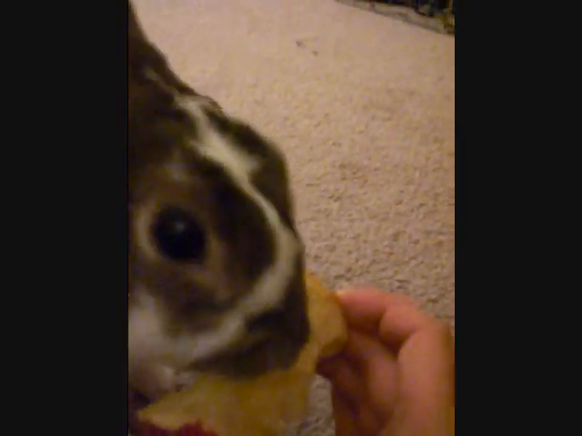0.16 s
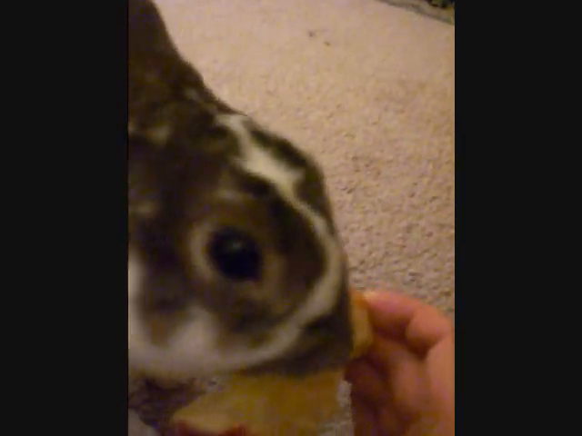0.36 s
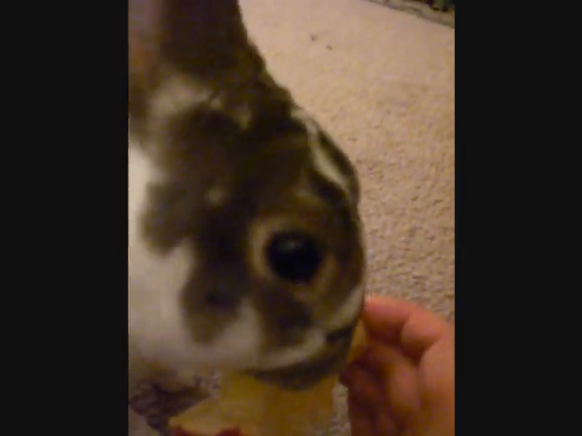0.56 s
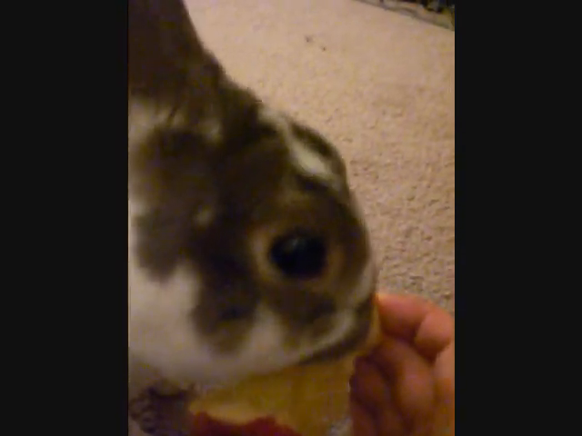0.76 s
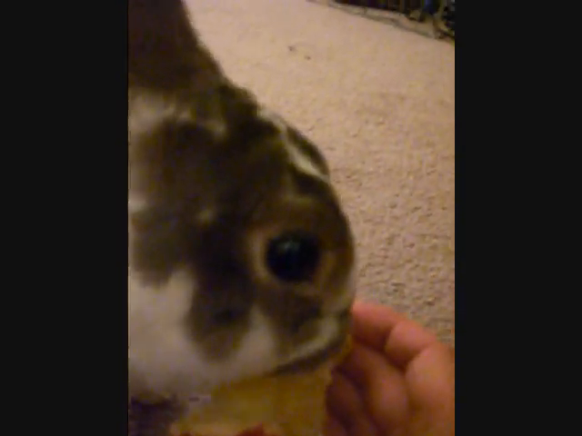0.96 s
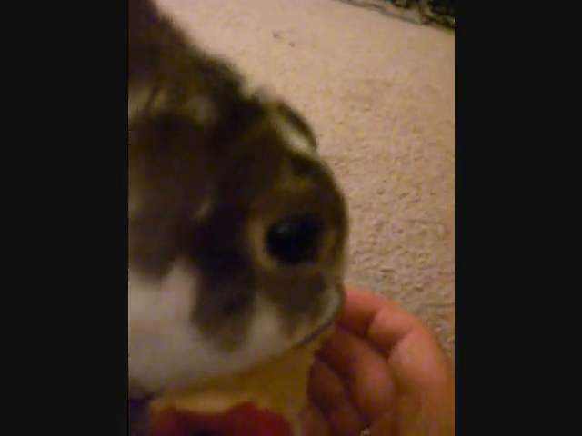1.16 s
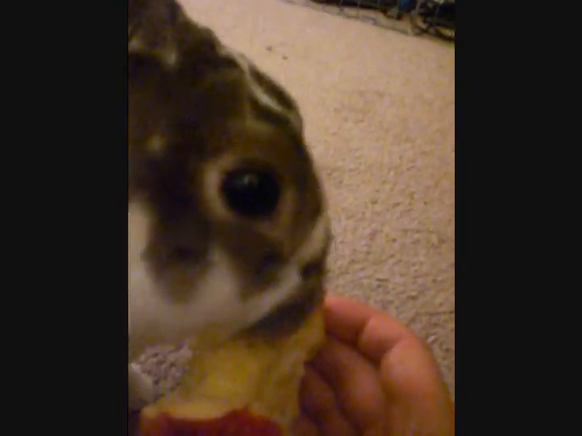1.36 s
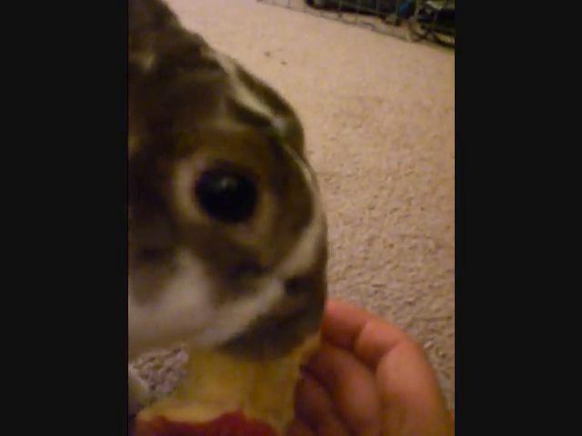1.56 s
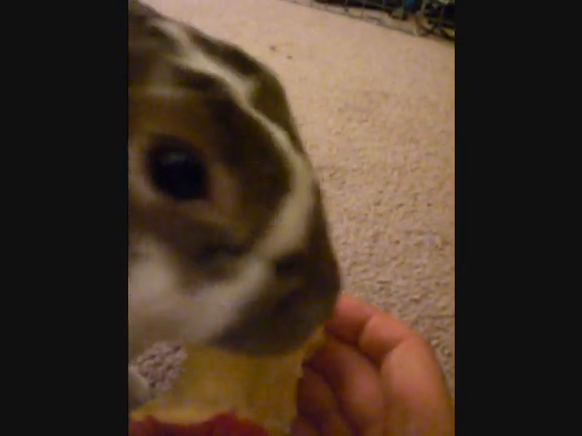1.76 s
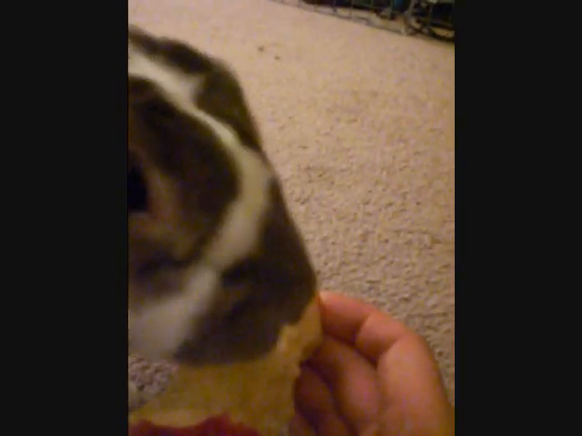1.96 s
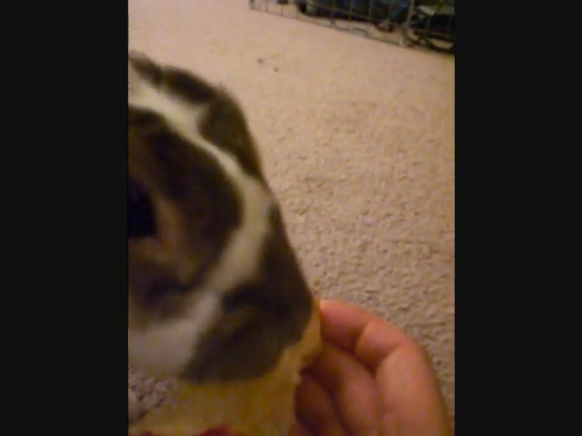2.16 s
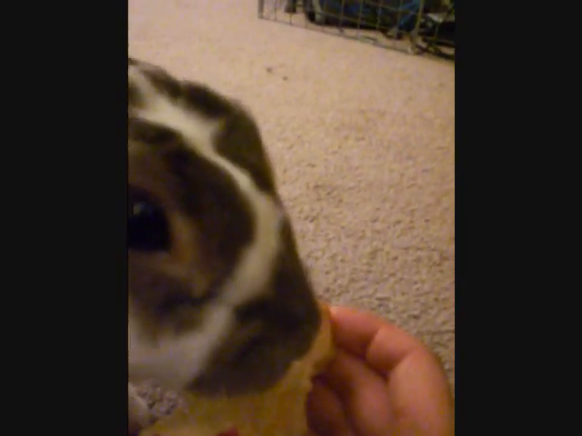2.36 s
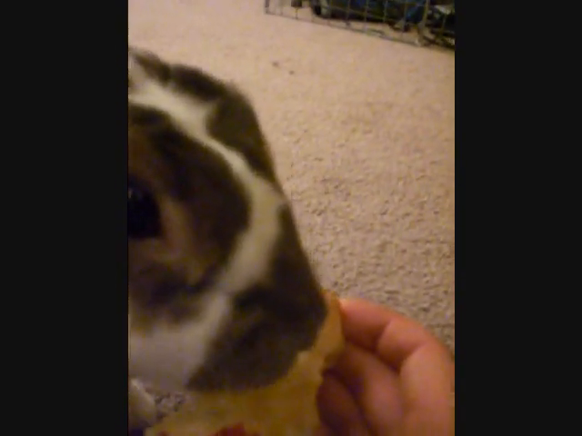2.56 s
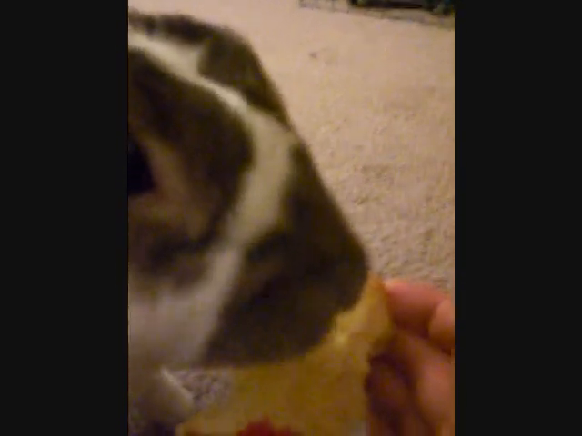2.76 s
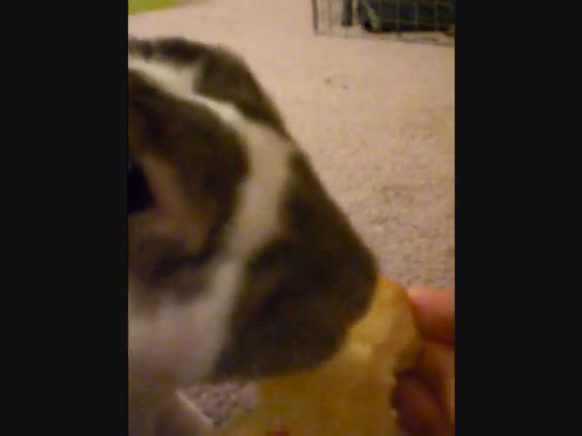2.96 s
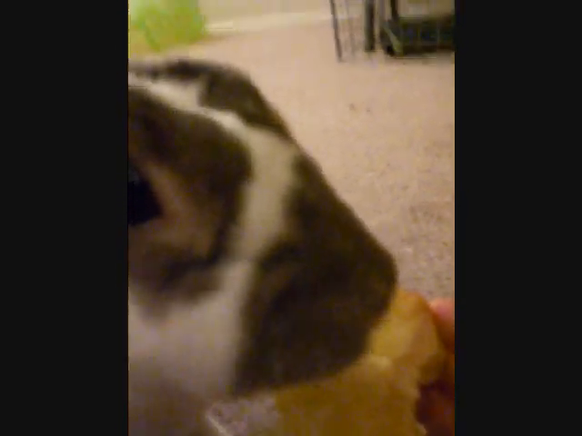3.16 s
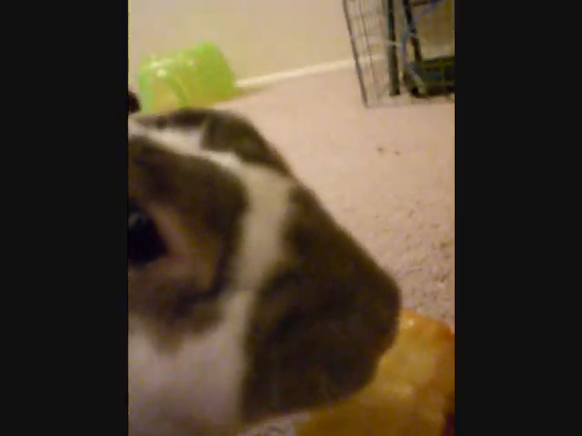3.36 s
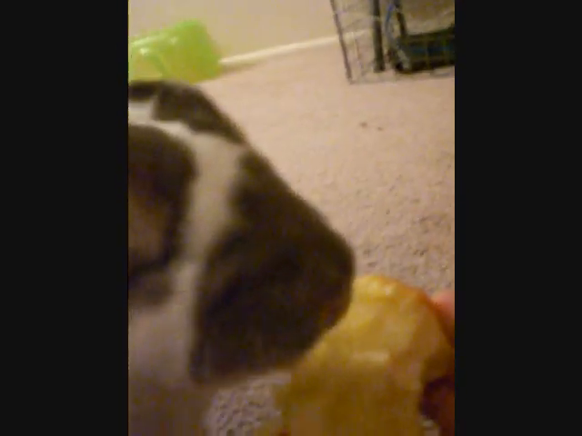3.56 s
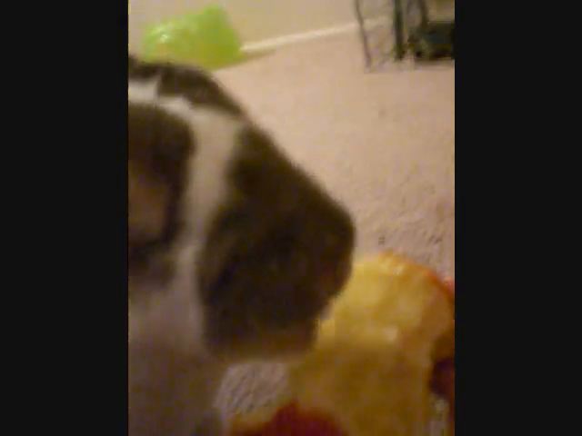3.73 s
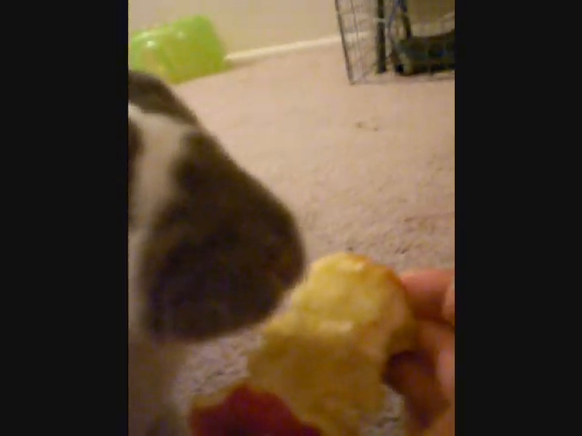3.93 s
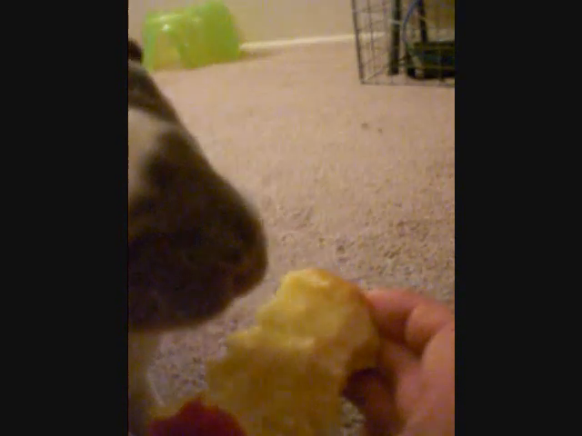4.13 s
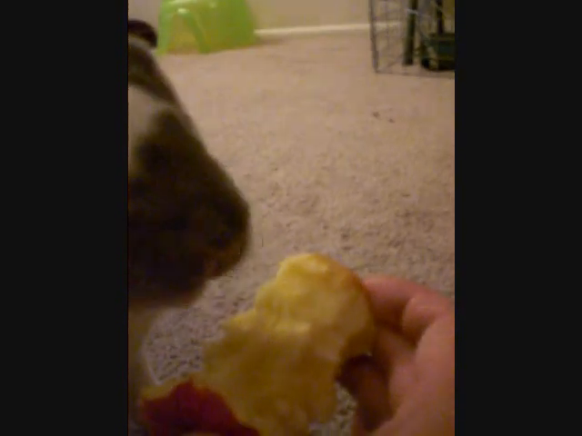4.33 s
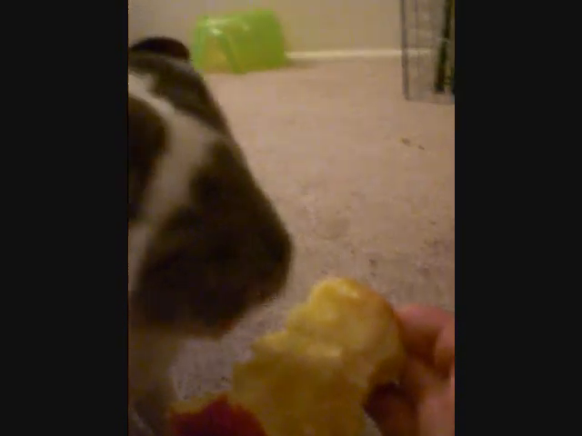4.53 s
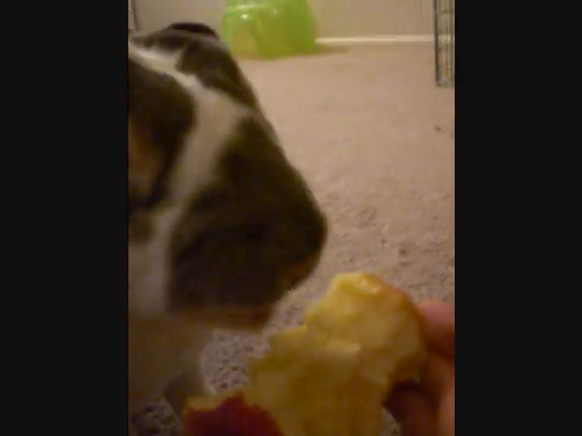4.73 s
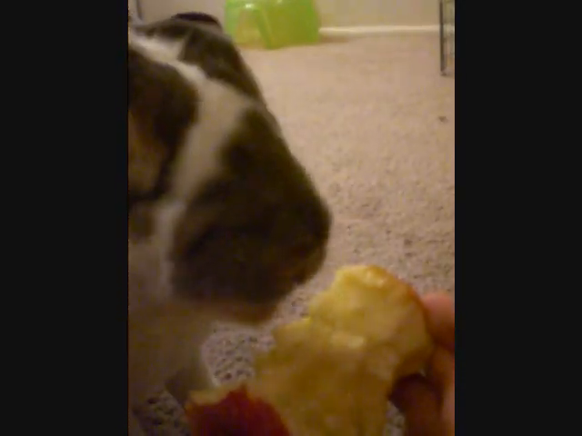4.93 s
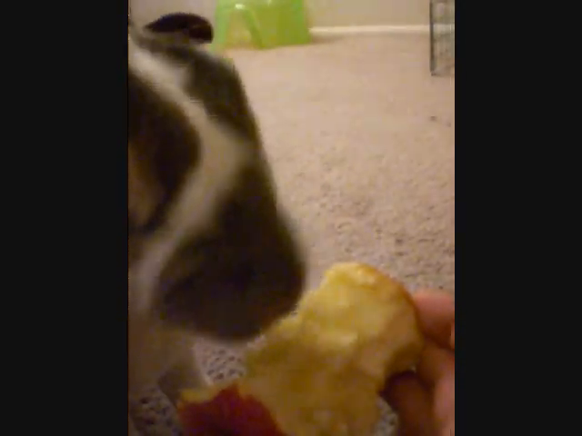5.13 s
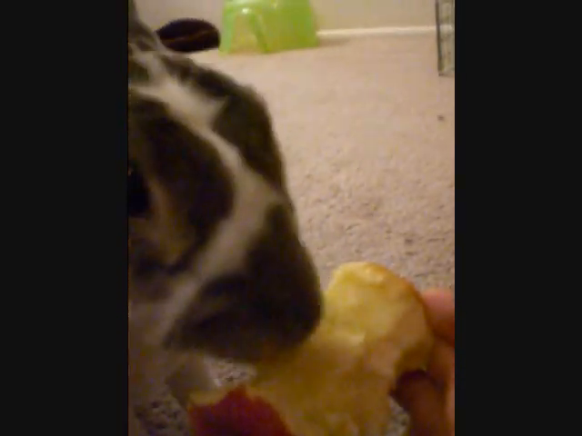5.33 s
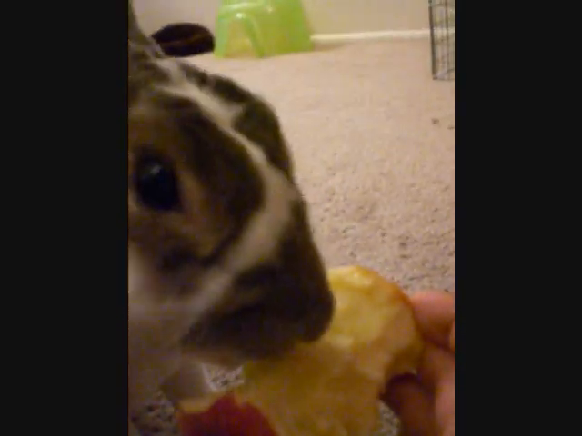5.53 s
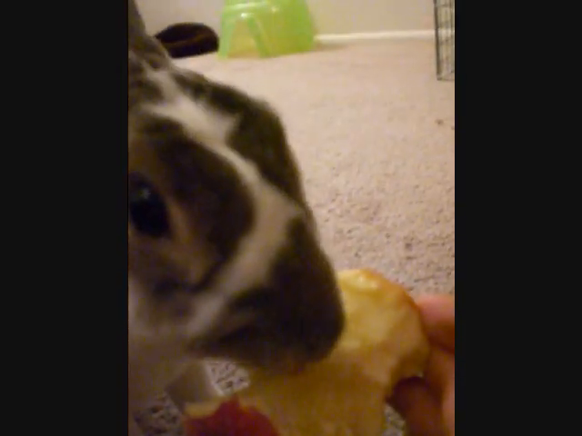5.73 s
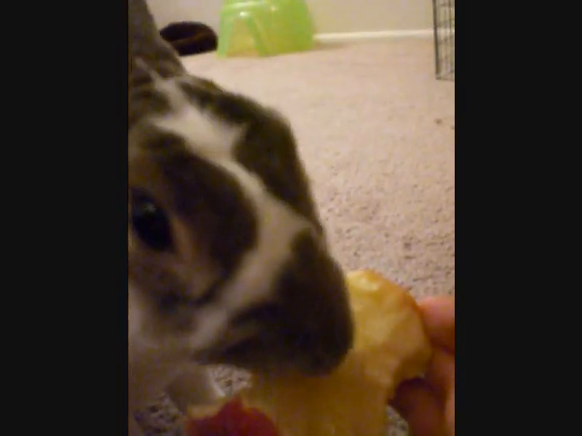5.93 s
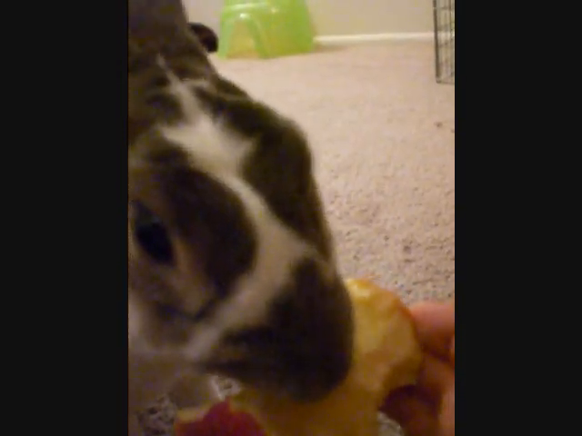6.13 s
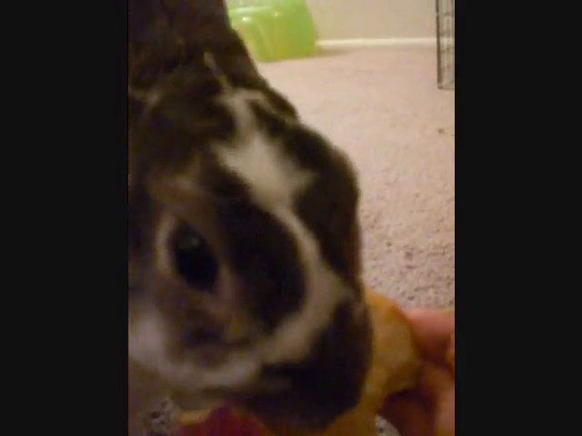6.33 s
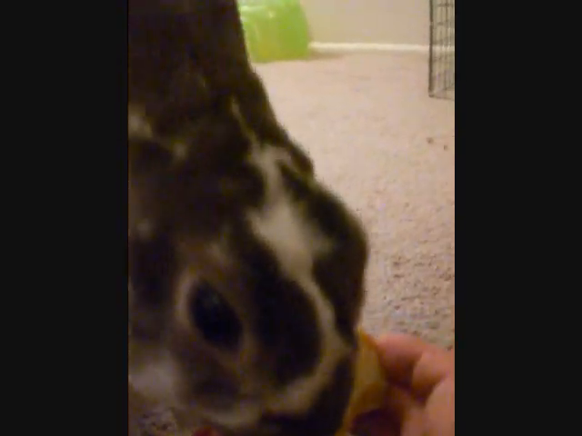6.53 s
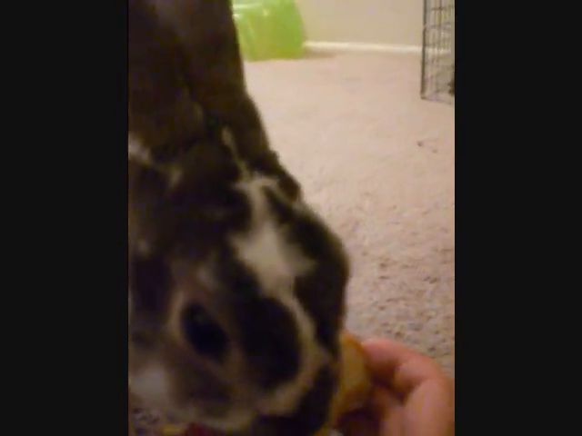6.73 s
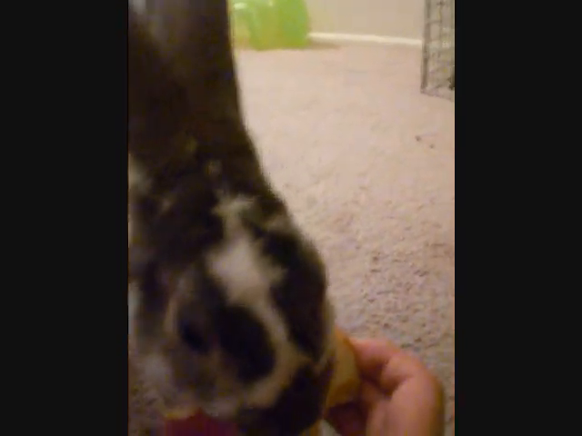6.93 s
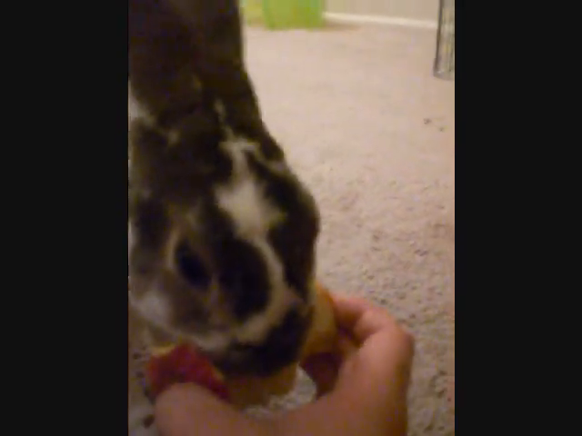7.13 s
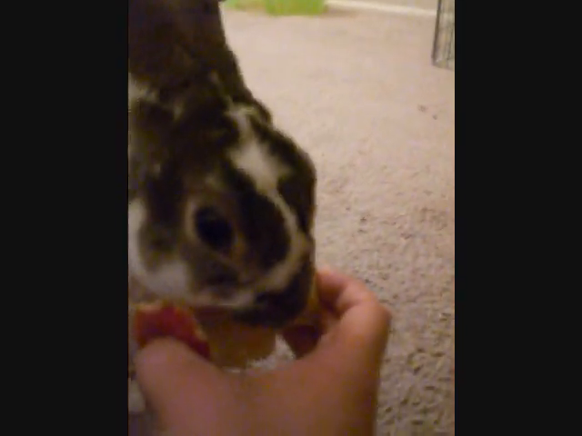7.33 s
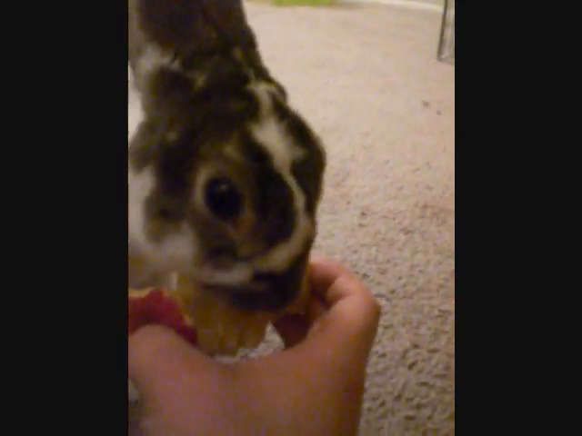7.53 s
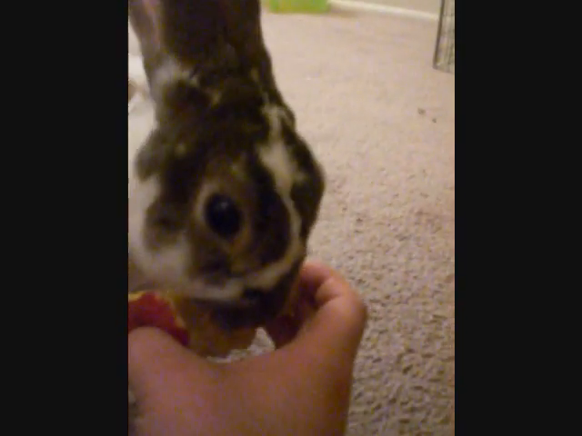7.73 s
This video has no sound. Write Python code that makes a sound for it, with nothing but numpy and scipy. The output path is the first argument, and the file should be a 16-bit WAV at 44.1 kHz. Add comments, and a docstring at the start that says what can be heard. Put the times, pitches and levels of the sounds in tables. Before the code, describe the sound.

Very close to a small microphone in a quiet carpeted room, a rabbit scrapes and bites crisp apple with juicy crunches and sharp snaps. After a second and a half it settles into soft, quick, pulpy chewing, about five strokes a second, with faint rubbing from movement. Near six seconds the crisp biting returns, brighter and with harder cracks, until the end.

```python
"""A rabbit bites crisp apple close to a small microphone: bursting cells excite resonances and noise bands.
Single fractures are sharp pulses with a splintering tail, ringing teeth and fruit. Two bouts of biting frame
some four seconds of closed-mouth chewing, about six strokes a second, some of them double; strokes also
underlie the first bout. Pressure pulses shape grinding, pulp and slosh noise. Gliding sines squeak, sparse
ticks mark wet lips, and filtered noise gives the rubbing and room hush."""
import sys
import numpy as np
from scipy import signal
from scipy.fft import rfft, irfft, next_fast_len
from scipy.io import wavfile
from scipy.ndimage import uniform_filter1d

SR = 44100
rng = np.random.default_rng(int(sys.argv[2]) if len(sys.argv) > 2 else 0)


def materialize(psi):
    """Save the field psi as 16-bit PCM at rate SR to the path in sys.argv[1].

    A 1-D psi becomes a single channel; in a 2-D psi each row is a channel.
    """
    bounded = np.clip(np.atleast_2d(psi).T, -1, 1)
    quanta = np.round(bounded * 32767).astype(np.int16)
    wavfile.write(sys.argv[1], SR, quanta)


N = 343539
TIME = np.arange(N) / SR

# Steady room hush, as a spectrum: f/Hz, relative level/dB
ROOM_SPECTRUM = [(25, -15), (60, -5), (130, -1.5), (200, -1), (330, -3), (600, -5.5), (1200, -9.5),
                 (2500, -15), (5000, -22), (10000, -26)]
# Rabbit and hand shifting, each move swelling and fading:
# middle t/s, half-width t/s, rumble level/dB, rub level/dB, swish level/dB
MOVES = [(0.5, 1.6, -71, -56, -66), (2.55, 1.05, -73, -53, -61.5), (4.0, 0.45, -56, -54.5, -55),
         (5.1, 0.6, -63, -57.5, -63.5), (7.0, 1.2, -80, -66.5, -64)]
# Spectra of the three friction layers, low to high: f/Hz, relative level/dB
RUMBLE_SPECTRUM = [(50, -17), (115, 1), (160, -8.5), (208, 10.5), (235, -3), (285, 6.5), (330, -9),
                   (600, -34.5)]
RUB_SPECTRUM = [(400, -2), (1000, 3), (1900, 2.5), (2700, -5), (4000, -10), (9000, -55)]
SWISH_SPECTRUM = [(1000, -23), (3000, 5.5), (6000, 9), (10000, 3)]
# Teeth scraping lightly all through a bout of biting: start t/s, end t/s, crunch level/dB
SCRAPING_BOUTS = [(0, 1.46, -58), (6.046, 7.79, -60.5)]
# Incisors pressing through the apple: start t/s, length t/s, attack t/s, mid-bite crunch level/dB,
# swell over the bite level/dB, body re crunch level/dB, fizz re crunch level/dB,
# resonance of the hollow between lips and fruit f/Hz
BITES = [(0.081, 0.18, 0.028, -40.5, -3.5, -2, -5, 4450), (0.436, .19, 0.021, -41.5, -3, -4, -3.5, 3860),
         (0.807, .2, 0.014, -42, 1, -6, -5.5, 4870), (1.052, .11, .02, -54, 5, -2, -2, 3780),
         (1.155, 0.19, 0.026, -44.5, -1, -4.5, -1, 3430), (1.392, 0.053, .02, -48, 0, -5, -2.5, 3460),
         (5.908, .038, 0.0065, -47.5, -1, 4.5, -4, 5940), (6.103, 0.088, 0.01, -37.5, -3, -6, -1, 5870),
         (6.297, 0.11, 0.049, -38.5, -7.5, -3, 1.5, 5730), (6.446, 0.1, 0.011, -48.5, -8, -2.5, -0.5, 5600),
         (6.699, 0.17, 0.027, -43, -6, -1.5, 2, 5870), (6.878, 0.028, .005, -53, 1, -9, -10, 5500),
         (6.994, 0.2, 0.016, -44.5, 4, -2.5, -4.5, 5750), (7.361, 0.096, 0.032, -40, 7, -3.5, 2.5, 5760),
         (7.462, 0.094, 0.008, -40, -5, -3, -1, 3600), (7.754, 0.044, .003, -43, 2, 2.5, 6.5, 6140)]
# A patch of cells giving way all at once:
# middle t/s, half-width t/s, crunch level/dB, fizz re crunch level/dB
COLLAPSES = [(0.108, 0.0056, -42, -7), (0.242, 0.012, -33, -15), (0.467, 0.0046, -41, 0),
             (0.501, 0.0085, -32.5, -2), (0.768, 0.0029, -44, 0), (0.838, 0.018, -45.5, 4),
             (0.938, 0.0036, -39, -10), (0.962, 0.011, -38, -13), (1.028, 0.011, -38.5, -1),
             (1.282, 0.013, -35, -3), (1.315, 0.0043, -41, 10), (6.15, 0.0035, -33, 6.5),
             (6.162, 0.009, -35.5, 5), (6.359, .004, -35, 3), (6.382, 0.0064, -32.5, -15),
             (6.43, 0.0054, -34, -5), (6.47, 0.0044, -35.5, -3), (6.606, 0.0047, -43, 8.5),
             (6.776, 0.022, -36.5, 4.5), (7.08, 0.019, -40, -2), (7.128, 0.015, -39, 4.5),
             (7.423, 0.0055, -30, -10), (7.546, 0.0045, -40, -8)]
# Single fractures and tooth clicks: t/s, nominal crack energy level/dB, ring f/Hz,
# body re crack level/dB, fizz re crack level/dB
FRACTURES = [(0.0085, -19, 2400, -6, -13), (0.1172, -10.5, 4300, -22, -11), (0.1412, -6, 4350, -6, -5.5),
             (0.1816, -25, 3200, -17, -8), (0.2377, -16, 3600, -18, 4), (0.2491, -2, 4460, -12, -10),
             (0.265, -31, 4000, 13, -6), (0.397, -29, 4500, 5, 4.5), (0.8866, -3, 5300, -11, -20),
             (0.905, -18, 5200, -20, -18), (0.9338, -12, 4870, -7, -23), (0.9486, -10.5, 4720, -6, -22),
             (0.9864, -13, 5200, -23, -15), (0.9903, -7.5, 5340, -14, -12), (1.0263, 1.5, 5380, -9, -6.5),
             (1.2692, -11.5, 3300, -17, -10), (1.2805, -10.5, 3680, -10, -6),
             (1.5256, -18.5, 3360, -12, -27), (1.5322, -16.5, 3450, -9, -23),
             (1.5774, -17.5, 6440, -13, -21), (1.5993, -23.5, 4570, 2, -18), (1.6392, -12.5, 3100, -2, -5),
             (1.7268, -28, 4500, 10.5, -12), (1.7595, -22, 2940, -18, -25), (1.791, -18.5, 2860, -5, -20),
             (1.9514, -23.5, 2940, 7, -26), (1.966, -20.5, 2710, 3, -32), (2.5498, -18.5, 2950, -29, -22),
             (2.583, -23.5, 3140, -7, -32), (2.7752, -16, 2950, -8, -24), (3.3903, -16.5, 2870, -6, -22),
             (3.588, -9.5, 3100, -7, -15), (3.7969, -24.5, 5000, 2, -14), (4.0712, -33, 2400, 18, -14),
             (4.598, -23, 4550, -16, -26), (4.7806, -28.5, 4060, -8, -20), (4.9951, -24.5, 4300, 6, -18),
             (5.1761, -33.5, 3000, 18, 2), (5.4114, -39, 4000, 15, -13), (5.9422, -25, 4370, 4, -4),
             (5.9983, -33, 2400, 20, -22), (6.004, -31.5, 2400, 12, -18), (6.0085, -29, 2400, 11, -18),
             (6.073, -29, 3500, -7, -7), (6.2758, -18.5, 5960, -11, -7), (6.3849, -8, 5900, -9, -19),
             (6.4209, 1, 4170, -9, -4.5), (6.5649, -32, 6000, -12, 5), (6.579, -16.5, 5760, -9, 4),
             (6.5992, -28.5, 5900, 11.5, 8), (6.6107, -18, 6430, -13, 1), (6.6655, -22.5, 5660, -7, -1),
             (6.859, -9, 6240, -7.5, -6), (6.9399, -26, 3500, -1, -2), (6.9714, -17.5, 3900, 0, -9),
             (7.0782, 7, 4880, -5.5, -15), (7.1072, -9.5, 5640, -8.5, -14), (7.3283, -26.5, 3700, 2, 2),
             (7.474, -6.5, 3400, -8.5, -0.5), (7.5178, -8.5, 3640, -15, -12), (7.6763, -23, 6100, -6, -1.5)]
# Molar strokes, a double stroke taking two rows: greatest pressure t/s,
# cheek level/dB and pulp level/dB before the layer trims,
# closing time of the pulp t/s, cheek resonance f/Hz
MOLAR_STROKES = [(.05, -46, -52, 0.012, 930), (0.54, -42, -43, 0.004, 870), (.874, -45.5, -54, 0.024, 910),
                 (1.281, -40.5, -48, .012, 910), (1.532, -56, -53, 0.018, 1300),
                 (1.64, -53.5, -56, 0.066, 1220), (1.792, -45.5, -53.5, 0.012, 1200),
                 (1.957, -62, -69, 0.019, 1190), (2.065, -49, -51, 0.025, 930),
                 (2.272, -49.5, -52, 0.025, 890), (2.47, -55, -55, 0.027, 890),
                 (2.708, -43.5, -48.5, 0.015, 940), (2.88, -50.5, -57.5, 0.025, 850),
                 (2.932, -48.5, -52.5, 0.028, 910), (3.139, -50.5, -50.5, .046, 910),
                 (3.338, -45.5, -49, 0.032, 960), (3.534, -45.5, -48.5, 0.036, 970),
                 (3.676, -46, -51, 0.01, 910), (3.742, -48.5, -54.5, 0.032, 880),
                 (3.925, -53, -52.5, .025, 980), (3.969, -48, -49.5, 0.017, 940),
                 (4.228, -73, -49, .0095, 1090), (4.362, -53.5, -67, .02, 1020),
                 (4.443, -51, -56, .01, 920), (4.508, -48, -51, 0.027, 890), (4.733, -46.5, -50, .018, 950),
                 (4.97, -45.5, -50.5, 0.024, 990), (5.185, -51, -56.5, .05, 1040),
                 (5.38, -47, -48.5, 0.016, 970), (5.569, -49, -50.5, 0.02, 1030),
                 (5.749, -48, -49.5, 0.039, 1090)]
# Spectrum of the squelching pulp: f/Hz, relative level/dB
PULP_SPECTRUM = [(500, -3), (1000, 2.5), (1600, 4.5), (2300, 2), (3100, 3.5), (4200, -4), (6000, -2),
                 (10000, -10)]
# Short wet squeaks of the fruit: start t/s, length t/s, start f/Hz, end f/Hz, rms level/dB
FRUIT_SQUEAKS = [(1.041, 0.0039, 990, 890, -46), (5.198, 0.065, 1390, 1197, -55)]
# Narrow dips of the microphone port: f/Hz, width f/Hz, depth level/dB
PORT_DIPS = [(6640, 250, -33), (7380, 127, -24)]

ROOM_DB, DRONE_DB, DRONE_HZ, DRONE_WIDTH_HZ = -54, -61, 239.2, 13.4
BITE_RELEASE_S = 0.0077
COLLAPSE_BODY_DB = -7.5  # re its crunch
SCRAPE_BODY_DB, SCRAPE_FIZZ_DB = -2, -2  # re its crunch
SCRAPE_FADE_S, SCRAPE_UNEVEN_DB = 0.01, 1.5  # the teeth catch and slip
CUTOFF_HZ = 10900


def from_db(db):
    """Logarithmic level: decibels become an amplitude gain."""
    return 10 ** (np.asarray(db) / 20)


def rms_one(x):
    """Normalisation: scale a signal to unit rms."""
    return x / np.sqrt(np.mean(x ** 2) + 1e-20)


def band(x, low_hz, high_hz, order=2):
    """Band limitation: a causal Butterworth band-pass."""
    edges_hz = [low_hz, min(high_hz, SR / 2 - 1000)]
    return signal.sosfilt(signal.butter(order, edges_hz, "band", fs=SR, output="sos"), x)


def resonator_poles(hz, r):
    """Damped oscillation: recursive coefficients of a resonance with decay r per sample."""
    return [1, -(1 + r * r) * np.cos(2 * np.pi * hz / SR), r * r]


def resonate(x, hz, width_hz):
    """Resonance: a damped oscillator with gain 1 at its peak."""
    r = np.exp(-np.pi * width_hz / SR)
    zeros = np.array([1, 0, -1]) * (1 - r * r) / 2
    return signal.lfilter(zeros, resonator_poles(hz, r), x)


def glide(x, hz, width_hz, size=256):
    """Moving resonance: an oscillator whose centre follows a curve, in blocks of `size` samples."""
    out, state, r = np.zeros(N), np.zeros(2), np.exp(-np.pi * width_hz / SR)
    for i in range(0, N, size):
        poles = resonator_poles(hz[i], r)
        out[i:i + size], state = signal.lfilter([1, 0, -1], poles, x[i:i + size], zi=state)
    return out


def colour(x, spectrum):
    """Spectral shaping: a smooth curve over log frequency weights the signal; rms 1."""
    hz, db = np.transpose(spectrum)
    size = next_fast_len(N)
    f = np.maximum(np.fft.rfftfreq(size, 1 / SR), 1)
    gain = from_db(np.interp(np.log(f), np.log(hz), db)) * (f < CUTOFF_HZ + 500)
    return rms_one(irfft(rfft(x, size) * gain, size)[:N])


def drift(per_s):
    """Random modulation: twice-averaged noise wanders with rms 1."""
    width = max(int(SR / per_s), 1)
    once = uniform_filter1d(rng.standard_normal(N), width, mode="wrap")
    return rms_one(uniform_filter1d(once, width, mode="wrap"))


def cells(per_s, spread_db):
    """Shot noise: cell walls burst at random moments with uneven strength and either sign; rms 1."""
    strength = from_db(spread_db * np.clip(rng.standard_normal(N), -2, 2))
    sizes = strength * rng.choice([-1, 1], N)
    return rms_one(sizes * (rng.random(N) < per_s / SR))


def swell(s, half_width_s):
    """Gaussian envelope: a smooth rise and fall around one moment, height 1."""
    return np.exp(-.5 * ((TIME - s) / half_width_s) ** 2)


def press(start_s, length_s, attack_s, release_s):
    """Loading and relaxation: pressure builds evenly, holds, then decays exponentially."""
    t = TIME - start_s
    return np.clip(t / attack_s, 0, 1) * np.exp(-np.maximum(t - length_s, 0) / release_s)


def room():
    """Stationary noise: a steady hush, and narrow-band noise as a wavering hum like a distant appliance."""
    # the first second lets the resonance settle
    drone = resonate(rng.standard_normal(N + SR), DRONE_HZ, DRONE_WIDTH_HZ)[SR:]
    hush = colour(rng.standard_normal(N), ROOM_SPECTRUM)
    return from_db(ROOM_DB) * hush + from_db(DRONE_DB) * rms_one(drone)


def shuffle():
    """Friction noise: fur, hand and carpet rub softly, with moves adding in power."""
    power = np.zeros((3, N))
    for s, half_width_s, *levels_db in MOVES:
        power += np.outer(from_db(levels_db), swell(s, half_width_s)) ** 2
    out = np.zeros(N)
    for gain, spectrum in zip(np.sqrt(power), (RUMBLE_SPECTRUM, RUB_SPECTRUM, SWISH_SPECTRUM)):
        unevenness = from_db(0.59 * drift(per_s=6))
        out += gain * unevenness * colour(rng.standard_normal(N), spectrum)
    return out


def cutting():
    """Incoherent addition: bites, collapses and scraping sum in power to crunch, body and fizz gains."""
    parts = []
    for s, length_s, attack_s, crunch_db, swell_db, body_db, fizz_db, _ in BITES:
        progress = np.clip((TIME - s) / length_s, 0, 1)
        level = from_db(crunch_db + swell_db * (progress - .5))
        parts.append((level * press(s, length_s, attack_s, BITE_RELEASE_S), body_db, fizz_db))
    for s, half_width_s, crunch_db, fizz_db in COLLAPSES:
        parts.append((from_db(crunch_db) * swell(s, half_width_s), COLLAPSE_BODY_DB, fizz_db))
    catching = from_db(SCRAPE_UNEVEN_DB * drift(per_s=210))
    for s, end_s, crunch_db in SCRAPING_BOUTS:
        force = from_db(crunch_db) * catching * press(s, end_s - s, SCRAPE_FADE_S, SCRAPE_FADE_S)
        parts.append((force, SCRAPE_BODY_DB, SCRAPE_FIZZ_DB))
    power = np.zeros((3, N))
    for force, body_db, fizz_db in parts:
        power += np.outer(from_db([0, body_db, fizz_db]), force) ** 2
    return np.sqrt(power)


def bites(hollow_width_hz=750, hollow_db=-5.0, flesh_db=-3.0,
          mouth_hz=2050, mouth_width_hz=650, mouth_db=-5.5, fibre_db=-9):
    """Avalanche fracture: bursting cells ring hollow and mouth, fizz in the treble; fibres crackle singly."""
    crunch_gain, body_gain, fizz_gain = cutting()
    # each bite holds its own hollow resonance, with glides between bites
    edges = [(s + edge, hz) for s, length_s, *_, hz in BITES for edge in (0, length_s)]
    hollow_hz = np.interp(TIME, *np.transpose(edges))
    avalanches = rms_one(from_db(1.9 * drift(per_s=600) + 1.1 * drift(per_s=140)))

    mouth_ring = resonate(cells(per_s=2700, spread_db=8.5), mouth_hz, mouth_width_hz)
    mouth = from_db(mouth_db) * rms_one(mouth_ring)
    body = mouth + from_db(-5.5) * rms_one(band(cells(per_s=5000, spread_db=3.0), 950, 2300))
    jaw = from_db(-15.0) * rms_one(band(cells(per_s=2900, spread_db=2.0), 250, 800))
    hollow_ring = glide(cells(per_s=4000, spread_db=5.0), hollow_hz, hollow_width_hz)
    hollow = from_db(hollow_db) * rms_one(hollow_ring)
    flesh = from_db(flesh_db) * rms_one(band(cells(per_s=6000, spread_db=5.5), 3080, 7760, order=3))
    fizz = from_db(-2.5) * rms_one(band(cells(per_s=9200, spread_db=8.5), 8260, 10120, order=3))
    fibres = from_db(fibre_db) * rms_one(band(cells(per_s=350, spread_db=5), 1500, 7200))

    bursting = crunch_gain * (hollow + flesh) + body_gain * (body + jaw) + fizz_gain * fizz
    return avalanches * bursting + crunch_gain * fibres


def snaps(scatter_db=-18, scatter_s=0.0014, tail_db=-40, tail_s=0.0078,
          ring_width_hz=1500, tooth_hz=1300, tooth_width_hz=520, heft=2.1):
    """Impulse response: a break rings teeth and fruit, then splinters and reflects faintly nearby."""
    out, t = np.zeros(N), TIME[:SR // 25]
    decay = from_db(scatter_db) * np.exp(-t / scatter_s) + from_db(tail_db) * np.exp(-t / tail_s)
    noises = rng.standard_normal((len(FRACTURES), len(t)))
    for (s, crack_db, ring_hz, body_db, fizz_db), noise in zip(FRACTURES, noises):
        pulse = (t == 0) + noise * decay
        give_db = heft * max(crack_db, 0)  # only the hardest breaks jolt the whole piece of fruit
        tooth = from_db(-7.5) * rms_one(resonate(pulse, tooth_hz, tooth_width_hz))
        knock = from_db(-7.0) * rms_one(band(pulse, 380, 1800))
        thump = from_db(give_db - 26.5) * rms_one(band(pulse, 160, 1180))
        ring_once = resonate(pulse, ring_hz, ring_width_hz)
        ring = from_db(-2.0) * rms_one(resonate(ring_once, ring_hz, ring_width_hz))
        crack = from_db(-7.5) * rms_one(band(pulse, 2700, 6200, order=4))
        fizz = from_db(fizz_db + 2.5) * rms_one(band(pulse, 7300, 10140, order=3))
        snap = from_db(body_db) * (tooth + knock + thump) - ring - crack + fizz
        at = int(s * SR)
        # dividing by root length turns unit rms into unit energy
        out[at:at + len(t)] += (from_db(crack_db) * snap / np.sqrt(len(t)))[:N - at]
    return out


def chews(release_s=0.011, cheek_width_hz=480, pressure_share=0.91,
          slosh_lead_s=0.044, slosh_s=0.015, slosh_db=-7):
    """Modulated noise: the tongue gathers pulp, closing squelches it, grinding rings the cheeks."""
    cheeks, squeeze, gather = np.zeros((3, N))
    grinding = cells(per_s=4000, spread_db=6.0)
    for s, cheek_db, pulp_db, closing_s, hz in MOLAR_STROKES:
        near = slice(max(int((s - .2) * SR), 0), int((s + .1) * SR))
        t = TIME[near] - s
        # pressure on the cheeks rises a little faster than the pulp is squeezed
        pressure = np.exp(-.5 * (t / np.where(t < 0, closing_s * pressure_share, release_s)) ** 2)
        closing = np.exp(-.5 * (t / np.where(t < 0, closing_s, release_s)) ** 2)
        gathering = np.exp(-.5 * ((t + slosh_lead_s) / slosh_s) ** 2)
        ring = resonate(resonate(grinding[near], hz, cheek_width_hz), hz, cheek_width_hz)
        cheeks[near] += from_db(cheek_db) * pressure * rms_one(ring)
        squeeze[near] += from_db(pulp_db) * closing
        gather[near] += from_db(pulp_db + slosh_db) * gathering
    grains = cells(per_s=12000, spread_db=2.5) * from_db(1.5 * drift(per_s=250))
    pulp = squeeze * colour(grains, PULP_SPECTRUM)
    slosh = gather * rms_one(band(rng.standard_normal(N), 2180, 3540))
    return from_db(0.5) * cheeks + from_db(1.5) * pulp + slosh


def lips():
    """Sparse excitation: faint stray ticks of wet lips and tongue excite four broad resonances."""
    ticks = np.zeros(N)
    for hz in (3500, 5000, 8500, 10000):
        ticks += resonate(resonate(cells(per_s=7, spread_db=1.5), hz, 2500), hz, 2500)
    return from_db(-69) * rms_one(ticks)


def squeaks():
    """Frictional tone: wet flesh slips on a tooth, heard as a short sine falling in frequency."""
    out = np.zeros(N)
    for s, length_s, start_hz, end_hz, level_db in FRUIT_SQUEAKS:
        u = np.linspace(0, 1, int(length_s * SR))
        phase = 2 * np.pi * np.cumsum(start_hz + (end_hz - start_hz) * u) / SR
        tone = 2 * np.sin(np.pi * u) * np.sin(phase)  # rms near 1
        at = int(s * SR)
        out[at:at + len(u)] += from_db(level_db) * tone
    return out


def scene():
    """Superposition: all sources add in one channel, close and dry."""
    return (room() + shuffle() + bites() + snaps() + chews() + lips() + squeaks())[None]


def record(dry):
    """Band rejection: the microphone port cuts two notches in the treble; the top is cut steeply."""
    for hz, width_hz, depth_db in PORT_DIPS:
        dry = dry - (1 - from_db(depth_db)) * resonate(dry, hz, width_hz)
    return signal.sosfilt(signal.ellip(10, .3, 70, CUTOFF_HZ, fs=SR, output="sos"), dry)


dry = scene()
out = record(dry)
materialize(out)
```